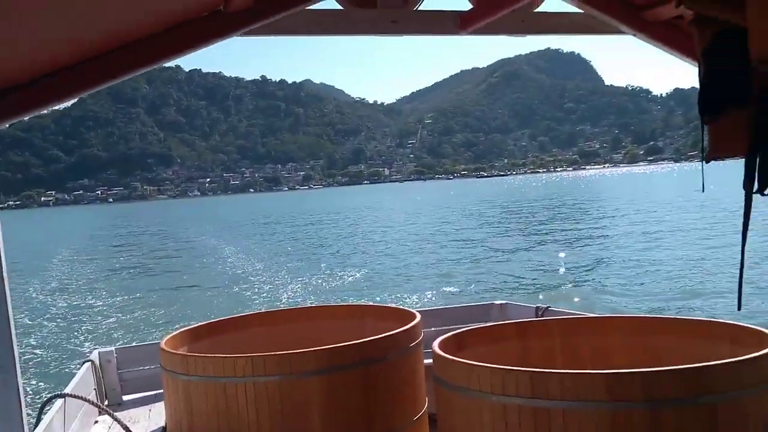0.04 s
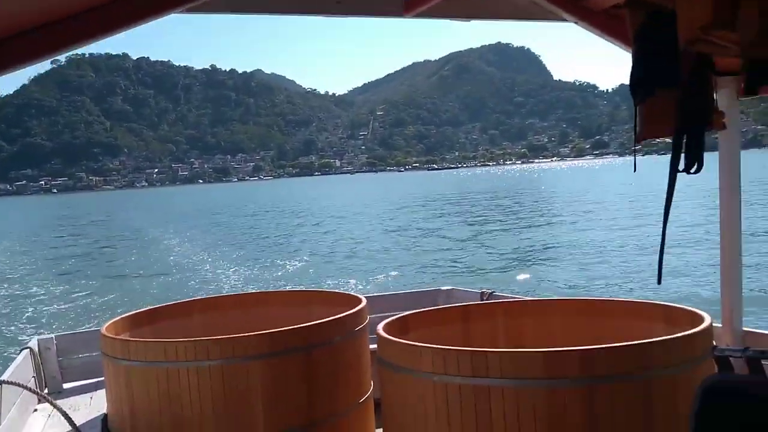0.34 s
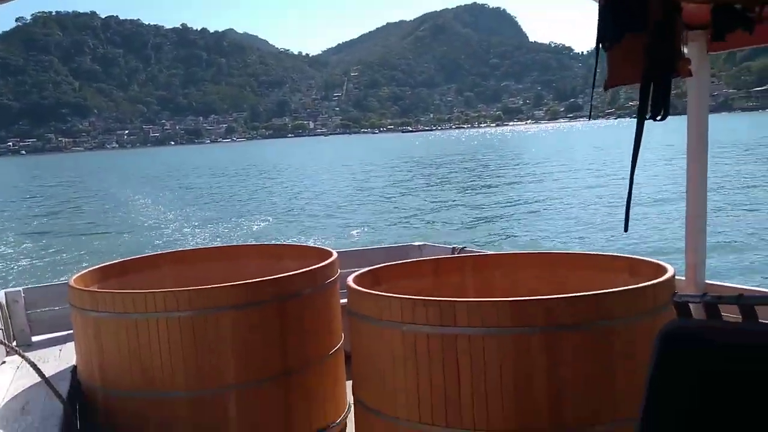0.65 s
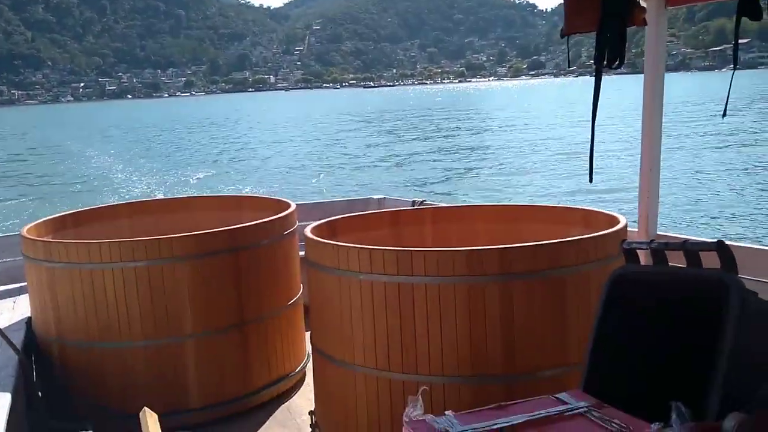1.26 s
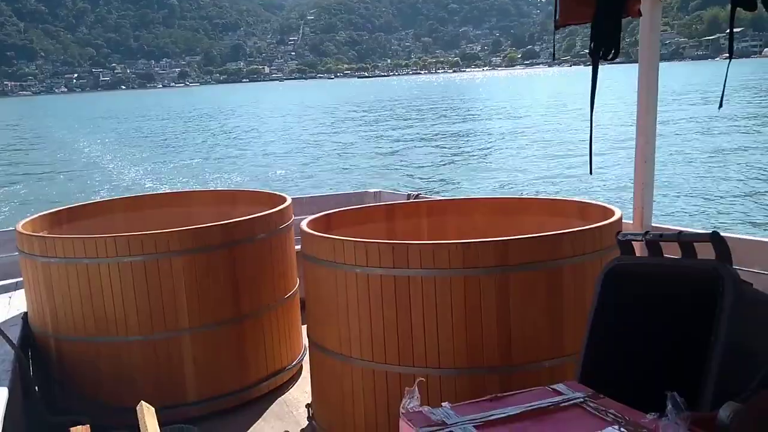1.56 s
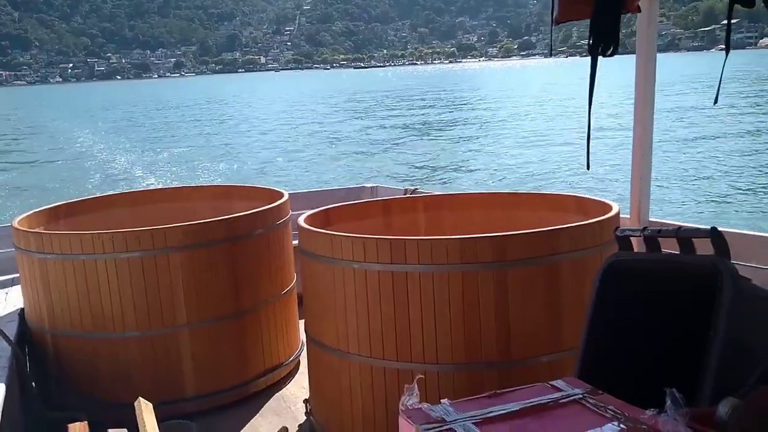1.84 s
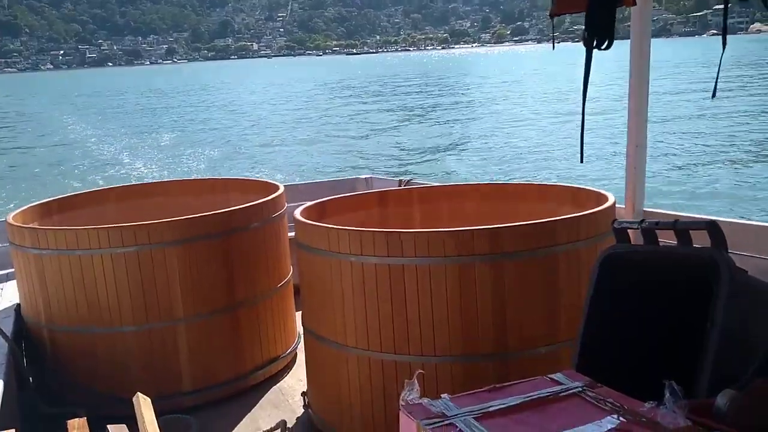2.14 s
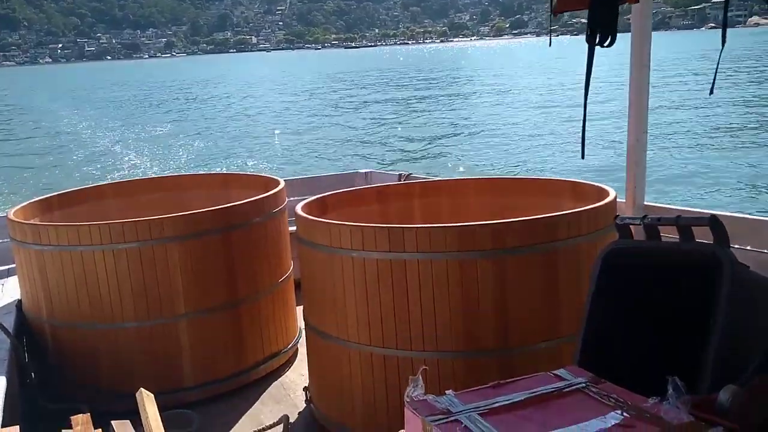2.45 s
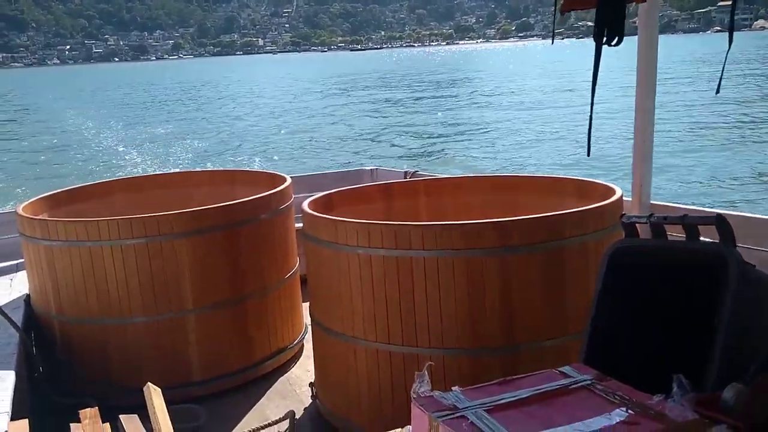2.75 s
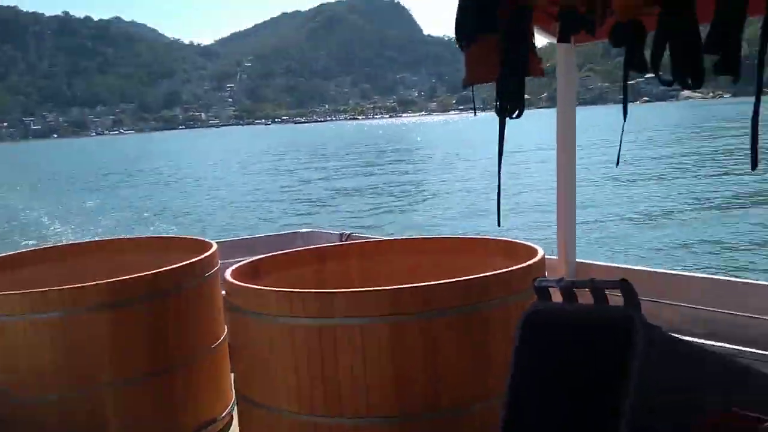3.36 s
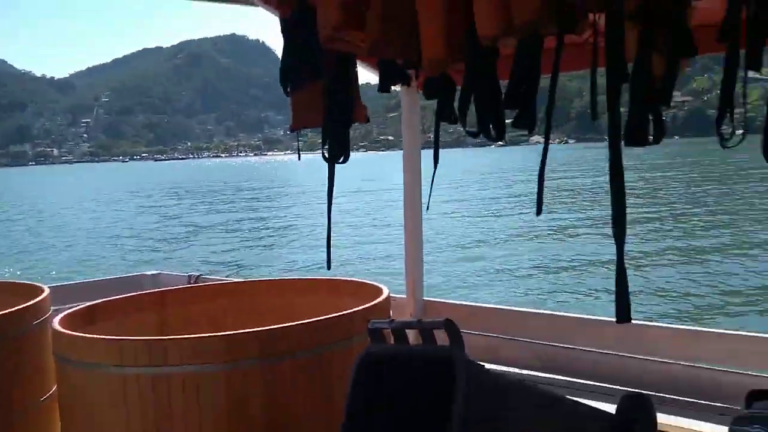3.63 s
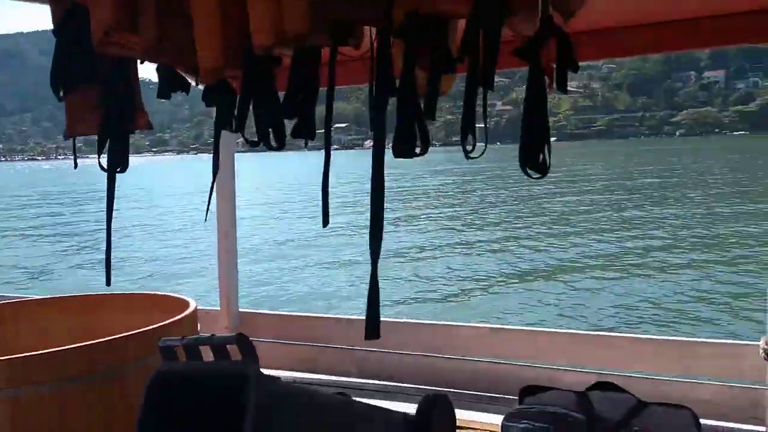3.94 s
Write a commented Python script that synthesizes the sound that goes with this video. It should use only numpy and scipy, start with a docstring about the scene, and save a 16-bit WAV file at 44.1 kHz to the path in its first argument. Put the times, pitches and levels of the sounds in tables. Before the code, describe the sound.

A diesel boat engine drones at constant speed with a fast, booming throb, a metallic rattle and a faint whine. Spray hisses off the hull and light wind brushes the microphone on the open deck.

```python
"""A throbbing diesel hum, heard from the open deck of a wooden boat at steady speed.
The three-cylinder engine repeats its cycle about twelve times a second, so its hum is a harmonic series;
neighbouring harmonics beat in the hull as a boom. The firings modulate a combustion roar and a metallic
rattle, a loose part rings and the gearbox whines. Spray hisses and light wind brushes the microphone."""
import sys
import numpy as np
from scipy import signal
from scipy.fft import rfft, irfft
from scipy.io import wavfile

SR = 44100
rng = np.random.default_rng(int(sys.argv[2]) if len(sys.argv) > 2 else 0)


def generate_wav(sig):
    """Save sig (samples, or channels by samples) to the path in sys.argv[1] as 16-bit PCM at SR."""
    pcm = np.round(np.clip(np.atleast_2d(sig).T, -1, 1) * 32767).astype(np.int16)
    wavfile.write(sys.argv[1], SR, pcm)


N = 176400

CYLINDERS, CYCLE_HZ = 3, 11.905  # nominal cycle rate; a cycle is two shaft turns
THROB_S = .072  # time of the first throb
# harmonics at which the hull booms (order of the cycle rate, level/dB)
HULL_ORDERS = [(20, -48), (21, -24.5), (22, -27.5), (23, -58)]
# slow swell of the treble; each layer follows a share of it (t/s, relative level/dB)
TREBLE_SWELL = [(0.0, 2.2), (0.41, 0.9), (0.54, -1.4), (0.7, 3), (0.84, 0.5), (1.11, 0.2), (1.26, 4),
                (1.41, 0.4), (1.94, 2.8), (2.01, -1.5), (2.23, 2), (2.59, 0), (2.75, 2.2), (3.01, 0),
                (3.43, 1.3), (3.69, 0), (3.85, 2.8), (3.99, 0.5)]
# slow swell of the deep bass, scaled by each layer (t/s, relative level/dB)
BASS_SWELL = [(0.0, -1), (0.48, 3.5), (0.6, -8), (0.92, 3.5), (1.24, -2.5), (1.8, -4), (1.91, 3.5),
              (2.6, -5), (2.97, -8), (3.17, 5), (3.43, 1.4), (3.68, -11), (3.85, 1), (3.99, 9)]


def undb(db):
    """Amplitude ratio of a level in dB."""
    return 10 ** (np.asarray(db) / 20)


def level(x, db):
    """Scale x to an RMS level in dB."""
    return x * undb(db) / np.sqrt(np.mean(x ** 2))


def curve(rows):
    """Linear interpolation through (t/s, value) rows."""
    return np.interp(np.arange(N) / SR, *np.array(rows).T)


def shape(rows, hz):
    """Gain at hz of a (f/Hz, level/dB) spectrum."""
    f, db = np.array(rows).T
    return undb(np.interp(np.log(np.maximum(hz, 1)), np.log(f), db))


def colour(x, rows):
    """Zero-phase filtering by a (f/Hz, level/dB) spectrum."""
    return irfft(rfft(x) * shape(rows, np.arange(N // 2 + 1) * SR / N), N)


def walk(rate_hz):
    """Low-pass Gaussian noise of zero mean and unit variance."""
    hz = np.arange(N // 2 + 1) * SR / N
    lowpass = np.exp(-(hz / rate_hz) ** 2) * (hz > 0)
    return level(irfft(rfft(rng.standard_normal(N)) * lowpass, N), 0)


def wind():
    """Turbulent pressure at the microphone: low gusts, largely coherent at its two ports."""
    # gust spectrum (f/Hz, relative level/dB)
    spectrum = [(15, -28), (35, -7), (50, -11), (66, 1), (95, 2), (140, -8), (250, -46)]
    common, left, right = (colour(rng.standard_normal(N), spectrum) for _ in range(3))
    ports = common + .12 * np.array([left, right])
    return level(ports * undb(1.3 * curve(BASS_SWELL)), db=-45)


def spray():
    """Incoherent noise of spray off the hull: an independent hiss on each side."""
    # hiss spectrum (f/Hz, relative level/dB)
    spectrum = [(1500, -53), (3400, -30), (3850, 11.5), (4400, 2.5), (8200, 1.5), (9500, -3),
                (12000, -11.5), (14000, -28)]
    sides = np.array([colour(rng.standard_normal(N), spectrum) * undb(.5 * walk(12)) for _ in range(2)])
    return level(sides * undb(.7 * curve(TREBLE_SWELL)), db=-48)


def loose_part(throb):
    """Resonance of a loose metal part: a narrow band of noise in uneven bursts on the throb."""
    # resonance curve (f/Hz, relative level/dB)
    spectrum = [(3300, -35), (3640, -15), (3750, 1), (3850, 5), (3940, -7), (4120, -7), (4400, -45)]
    envelope = 1 + .31 * np.cos(2 * np.pi * throb)
    ringing = colour(envelope * rng.standard_normal(N), spectrum)
    return level(ringing * undb(curve(TREBLE_SWELL) + 2 * walk(6.2)), db=-45)


def resonances(width_hz=35):
    """Narrow resonances swell out of the roar near the end: noise in Lorentzian bands."""
    # bands (start t/s, peak t/s, end t/s, centre f/Hz, level at the peak/dB)
    bands = [(3.4, 3.8, 3.8, 740, -32), (3.55, 3.855, 3.97, 825, -31.5), (3.6, 3.88, 4.07, 1403, -34.5)]
    hz = np.arange(N // 2 + 1) * SR / N
    sound = np.zeros(N)
    for start, peak, end, centre, db in bands:
        band = irfft(rfft(rng.standard_normal(N)) / (1 + (2 * (hz - centre) / width_hz) ** 2), N)
        sound += curve([(start, 0), (peak, 1), (end, 0)]) * level(band, db)
    return sound


def gearbox(fade_db_per_s=1.4):
    """Close gear tones, modulated in amplitude and phase, beat as a slowly fading whine."""
    # gear tones (f/Hz, level halfway through the fade/dB)
    tones = [(508.7, -39.8), (517.1, -42.5), (525.5, -39)]
    t = np.arange(N) / SR
    whine = np.zeros(N)
    for hz, db in tones:
        amplitude = np.sqrt(2) * undb(db + walk(3.5))
        whine += amplitude * np.sin(2 * np.pi * (hz * t + rng.random()) + .41 * walk(2.2))
    return whine * undb(-fade_db_per_s * (t - t.mean()))


def firings(cycle, strengths, decay_s=.012):
    """Relative pressure about its mean: a jump and an exponential decay as each cylinder fires."""
    count = cycle * CYLINDERS
    age_s = (count % 1) / (CYLINDERS * CYCLE_HZ)
    pressure = strengths[count.astype(int) % CYLINDERS] * np.exp(-age_s / decay_s)
    return pressure / pressure.mean() - 1


def rattle(pressure, throb, lag_s=.0077):
    """Resonances of injectors and valve gear, excited by noise that pulses with the engine."""
    # response of the metal (f/Hz, relative level/dB)
    spectrum = [(1500, -38), (2300, -17), (2600, -9.5), (2820, -5), (2950, -7), (3230, -8.5), (3500, -3),
                (3650, -4.5), (3820, -3), (4000, -10.5), (4200, -7), (4350, -22), (4700, -21), (5100, -14),
                (5600, -12), (6200, -15.5), (6800, -25.5), (7500, -16), (8200, -16.5), (8900, -22.5),
                (12300, -26.5), (14000, -37)]
    angle = 2 * np.pi * (throb - lag_s * CYCLE_HZ)
    per_cycle, per_turn = .044 * np.cos(angle), .055 * np.cos(2 * angle)
    envelope = (1 + .055 * pressure) * (1 + per_cycle + per_turn)
    metal = colour(envelope * rng.standard_normal(N), spectrum)
    return level(metal * undb(.9 * curve(TREBLE_SWELL) + .75 * walk(8.3)), db=-39)


def roar(pressure, throb):
    """Broadband combustion noise, amplitude-modulated by each firing and by the throb."""
    # combustion spectrum (f/Hz, relative level/dB)
    spectrum = [(20, -36), (35, -20), (50, -23), (65, -24), (95, -5.5), (150, -4.5), (195, -9), (250, -3),
                (350, -6.5), (430, -3), (510, -5.5), (570, -6.5), (800, -7), (980, -9.5), (1150, -12),
                (1420, -8.5), (1650, -17), (2020, -19.5), (2200, -31.5), (2600, -63), (5000, -75)]
    # swell of the roar, scaled below (t/s, relative level/dB)
    swell = [(0.0, 1.2), (0.2, 0.6), (0.29, -0.8), (0.56, -1.3), (0.76, 2.4), (0.91, -1.9), (1.29, 1.6),
             (1.7, -1.4), (1.87, 2), (2.08, -2.5), (2.21, 0.8), (2.57, -1.7), (2.71, 0.7), (3.0, -1.9),
             (3.09, 1.7), (3.34, -0.6), (3.9, 1), (3.99, -0.5)]
    envelope = (1 + .1 * pressure) * (1 + .092 * np.cos(2 * np.pi * throb))
    combustion = colour(envelope * rng.standard_normal(N), spectrum)
    return level(combustion * undb(1.1 * curve(swell)), db=-26)


def hull_boom(throb):
    """Beating: neighbouring harmonics in the hull's resonance add up and cancel once a cycle."""
    phase = rng.random()
    boom = np.zeros(N)
    for order, db in HULL_ORDERS:
        amplitude = np.sqrt(2) * undb(db + .84 * walk(4.4))
        boom += amplitude * np.cos(2 * np.pi * (order * throb + phase))
    return boom


def hum(cycle, strengths, size=8192, sets=4):
    """Periodic knocking as a Fourier series on the cycle rate; interleaved sets of orders flutter."""
    # spectral envelope of the knocks (f/Hz, relative level/dB)
    spectrum = [(40, -40), (100, 2.5), (300, 4), (550, -1), (900, -6.5), (1130, -7), (1400, -12),
                (1650, -7), (2000, -37), (3000, -34)]
    # strong harmonics (order of the cycle rate, relative level/dB)
    strong_orders = [(6, -40), (12, -32), (15, -37.5), (19, -43.5), (23, -65), (25, -37), (26, -41),
                     (27, -36), (28, -34), (29, -49), (30, -28), (31, -41), (34, -34), (38, -43),
                     (39, -49.5), (40, -46.5), (41, -34.5), (42, -31.5), (45, -38.5), (51, -41.5),
                     (52, -37), (55, -41.5), (61, -48), (62, -41.5), (64, -46.5), (65, -47.1), (66, -51.5),
                     (71, -54), (72, -40.5), (76, -51.5), (77, -45), (80, -43.5), (83, -46), (104, -46.5)]
    knock_db, strong_gain_db = -36.5, -.5
    grid = np.arange(size) / size  # one cycle
    per_cycle = .26 * np.cos(2 * np.pi * (grid - THROB_S * CYCLE_HZ))
    envelope = (1 + .61 * firings(grid, strengths)) * (1 + per_cycle)
    knocks = rfft(rng.standard_normal(size) * envelope)
    order = np.arange(len(knocks))
    gain = shape(spectrum, order * CYCLE_HZ) * (order > 0) * (order < size // 32)
    gain *= undb(knock_db) / np.sqrt(np.sum(gain ** 2))
    for k, db in strong_orders:
        gain[k] = undb(db + strong_gain_db)
    gain[[k for k, _ in HULL_ORDERS]] = 0  # these sound in hull_boom
    harmonics = gain * knocks / np.abs(knocks) * size / np.sqrt(2)  # the knocks set only the phases
    sound = np.zeros(N)
    for k in range(sets):
        period = irfft(harmonics * (order % sets == k))
        sound += np.interp(cycle % 1, grid, period) * undb(walk(8.2))
    return sound


def swell_bass(sound):
    """Amplitude modulation of the lowest band: the deepest part of the hum swells and sinks."""
    # low-pass response (f/Hz, level/dB)
    lowpass = [(80, -2), (125, -30)]
    deep = colour(sound, lowpass)
    return sound - deep + deep * undb(.59 * curve(BASS_SWELL))


def scene():
    """Superposition of the sources; one cycle phase keeps the engine's pulses in step."""
    # engine cycle rate (t/s, f/Hz)
    cycle_rate = [(0, 11.905), (.5, 11.9), (.9, 11.92), (2.5, 11.915), (3.2, 11.921), (4, 11.93)]
    wander, cylinder_spread_db = .0005, 1.5
    cycle = np.cumsum(curve(cycle_rate) * (1 + wander * walk(2.8))) / SR
    throb = cycle - THROB_S * CYCLE_HZ  # cycles since the first throb
    strengths = undb(cylinder_spread_db * rng.standard_normal(CYLINDERS))
    pressure = firings(cycle, strengths)
    drone = swell_bass(hum(cycle, strengths)) + hull_boom(throb) + gearbox() + resonances()
    clatter = roar(pressure, throb) + rattle(pressure, throb) + loose_part(throb)
    return drone + clatter + spray() + wind()


def record(dry):
    """Phase and level difference: the ports lose bass unequally, so the left leads; the top is cut."""
    # left port minus right (f/Hz, level/dB)
    balance = [(60, -6.5), (110, -.5), (200, 1), (600, 0.14)]
    left_corner_hz, right_corner_hz, top_hz = 113, 21.5, 14250
    hz = np.arange(N // 2 + 1) * SR / N
    bass = 1 / (1 + (hz / 700) ** 12)
    lead = np.arctan2(left_corner_hz, hz) - np.arctan2(right_corner_hz, hz)
    half_difference = np.exp(.5 * bass * (np.log(shape(balance, hz)) + 1j * lead))
    ports = irfft(rfft(dry) * np.array([half_difference, 1 / half_difference]), N)
    return signal.sosfilt(signal.ellip(10, .1, 80, top_hz, fs=SR, output="sos"), ports)


dry = scene()
out = record(dry)
generate_wav(out)
```